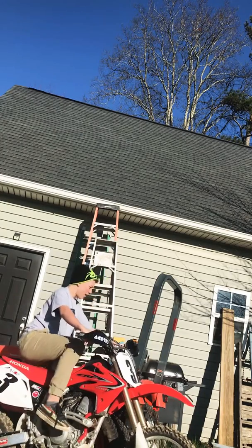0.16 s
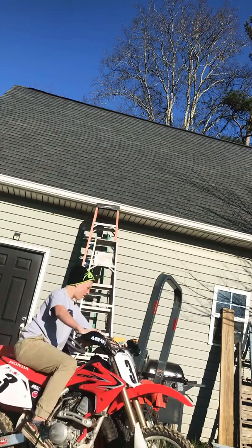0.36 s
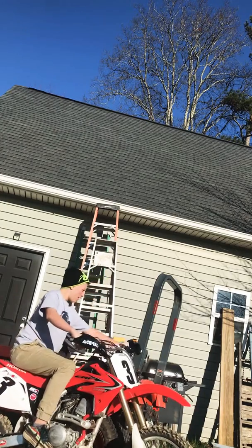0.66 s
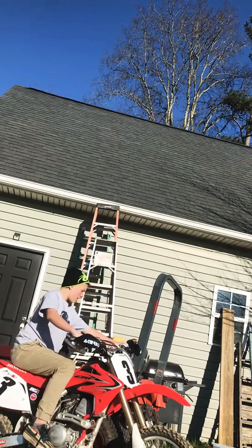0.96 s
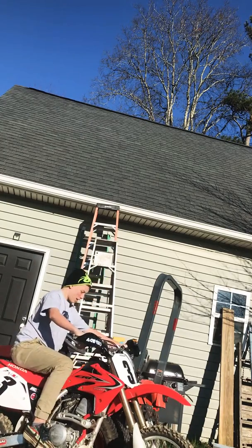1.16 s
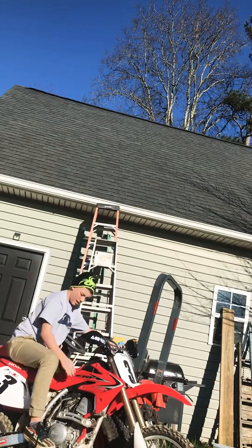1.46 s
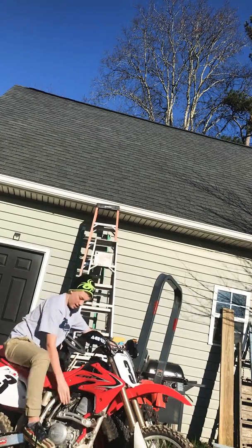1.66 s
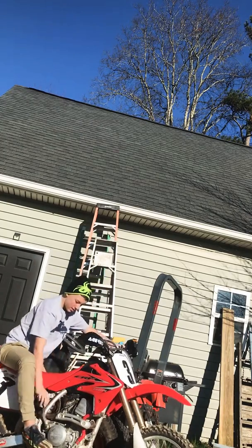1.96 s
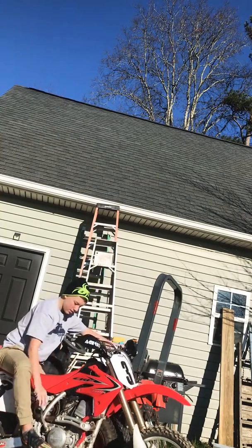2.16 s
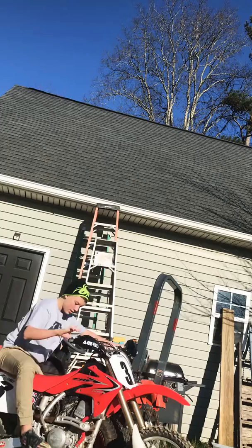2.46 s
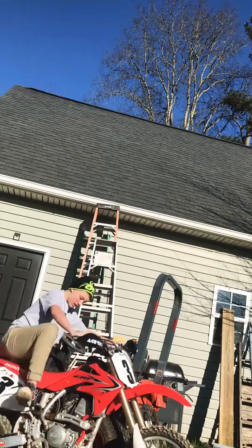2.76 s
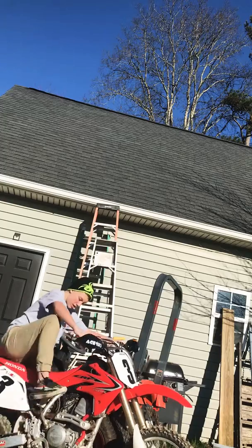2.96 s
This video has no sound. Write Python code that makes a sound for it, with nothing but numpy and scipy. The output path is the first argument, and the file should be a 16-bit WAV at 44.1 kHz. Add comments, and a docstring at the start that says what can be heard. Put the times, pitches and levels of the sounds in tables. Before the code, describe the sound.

A dirt bike engine fires close by, with quick exhaust thumps, clacks and a gritty whirr, then stalls with a ringing clank at about 0.6 seconds. Clothes rustle softly from around 1.2 seconds, and the bike creaks briefly near 1.7. Light metal knocks come near 1.2, between 2 and 2.5, and around 3 seconds. A low outdoor rumble and very faint electrical whine lie behind.

```python
"""Exhaust thumps, each led by a mechanical clack: a cold single-cylinder dirt bike fires a few times.
It stands near the microphone, in a yard beside a house wall that throws each thump back.
It stalls with a ringing clank; the rider shifts about, with rustling clothes, a short stick-slip
creak and light knocks on the bike. Behind it lie a low outdoor rumble and a faint electrical whine."""
import sys
import numpy as np
from scipy import signal
from scipy.fft import rfft, irfft, next_fast_len
from scipy.io import wavfile
from scipy.ndimage import uniform_filter1d

SR = 44100
rng = np.random.default_rng(int(sys.argv[2]) if len(sys.argv) > 2 else 0)


def materialize(psi):
    """Save the field psi as 16-bit PCM at rate SR to the path in sys.argv[1].

    A 1-D psi becomes a single channel; in a 2-D psi each row is a channel.
    """
    bounded = np.clip(np.atleast_2d(psi).T, -1, 1)
    quanta = np.round(bounded * 32767).astype(np.int16)
    wavfile.write(sys.argv[1], SR, quanta)


N = 136710
LEAD = SR // 10  # samples of run-up before time zero
TIME = np.arange(-LEAD, N) / SR


def amp(db):
    """Decibels to gain."""
    return 10 ** (np.asarray(db) / 20)


def unit(x):
    """Scale to rms 1."""
    return x / np.sqrt(np.mean(x ** 2) + 1e-20)


def colour(points, hz):
    """Gain of (freq_hz, level_db) points on a log axis, falling away past the ends."""
    f, db = np.transpose(points)
    inside = amp(np.interp(np.log(hz + 1), np.log(f + 1), db))
    return inside * np.minimum(1, hz / f[0]) ** 2 * np.minimum(1, f[-1] / (hz + 1)) ** 4


def filtered(x, response):
    """Pass x through a complex frequency response."""
    m = next_fast_len(len(x) + SR // 4)
    return irfft(rfft(x, m) * response(np.fft.rfftfreq(m, 1 / SR)), m)[:len(x)]


def resonances(modes, f):
    """Causal response of (pitch_hz, width_hz, level_db) modes, alternating in sign."""
    return sum((-1) ** k * amp(db) * 1j * f * width / (hz * hz - f * f + 1j * f * width)
               for k, (hz, width, db) in enumerate(modes))


def hump(f, centre_hz, octaves):
    """A bell on log frequency."""
    return np.exp(-.5 * (np.log2((f + 1) / centre_hz) / octaves) ** 2)


def noise(response):
    """Filtered noise of rms 1."""
    return unit(filtered(rng.standard_normal(len(TIME)), response))


def coloured_noise(points):
    """Noise of rms 1 with a tabled spectrum."""
    return noise(lambda f: colour(points, f))


def steadied(x, size):
    """Even out the loudness over size samples."""
    return x / np.sqrt(np.abs(uniform_filter1d(x * x, size)) + 1e-9)


def burst(start_s, rise_s, t60_s):
    """Envelope of a blow."""
    t = np.maximum(TIME - start_s, 0)
    return (1 - np.exp(-t / rise_s)) * amp(-60 * t / t60_s)


def tone(start_s, hz, rise_s, t60_s):
    """One struck mode."""
    return burst(start_s, rise_s, t60_s) * np.sin(2 * np.pi * hz * (TIME - start_s))


def yard(x, t60_s):
    """The diffuse tail that reaches the microphone from around the yard."""
    t = np.arange(SR) / SR
    tail = rng.standard_normal(SR) * amp(-60 * t / t60_s) * (1 - np.exp(-t / .0092))
    return signal.fftconvolve(x, tail / np.linalg.norm(tail))[:len(x)]


# Distant rumble and the hiss above it: freq_hz, level_db
RUMBLE = [(15, -28), (25, -10.5), (87, 1), (168, -14), (222, -16), (345, -25), (629, -30.5), (816, -28),
          (884, -28.5), (1290, -26), (1550, -26.5), (1820, -34), (2180, -39.5), (3000, -38), (3900, -49.5),
          (6600, -120)]
HISS = [(2200, -10.5), (4200, 5.5), (5200, 3.5), (8000, 0), (11500, 0), (13300, -0.5), (14050, 6),
        (14700, 0), (15800, -3)]
def outdoor_air():
    """The bed of the place: steady low rumble under a faint hiss."""
    return amp(-53) * steadied(coloured_noise(RUMBLE), size=8000) + amp(-75) * coloured_noise(HISS)


# Gaps in the whine: start_s, stop_s
WHINE_PAUSES = [(1.19, 1.25), (1.85, 1.94), (2.47, 2.53)]
# Spectrum of a tick: freq_hz, level_db
TICK = [(1500, -17), (2800, -1.5), (3500, -5.5), (4300, -3.5), (5500, -11.5), (7500, -7.5), (9000, -18),
        (15000, -15)]
def electrics(whine_hz=7020, width_hz=70, tick_period_s=.1024, tick_t60_s=.015):
    """Far in the background, a thin electrical whine and regular ticks."""
    paused = sum((TIME > start) & (TIME < stop) for start, stop in WHINE_PAUSES)
    running = uniform_filter1d(1. - paused, size=1800)
    whine = steadied(noise(lambda f: np.exp(-.5 * ((f - whine_hz) / width_hz) ** 2)), size=400)
    since_tick = (TIME - .7165) % tick_period_s
    ticks = amp(-58.5 - 60 * since_tick / tick_t60_s) * coloured_noise(TICK)
    return amp(-76) * running * whine + ticks


def pips(pitch_hz=10300, spread_hz=150, gap_s=.07, half_s=.006):
    """Tiny high pips at uneven gaps."""
    times = np.cumsum(gap_s * (.5 + rng.random(size=50)))
    pitches = rng.normal(pitch_hz, spread_hz, len(times))
    nearest = np.searchsorted((times[1:] + times[:-1]) / 2, TIME)
    t = TIME - times[nearest]
    return amp(-77.5) * np.exp(-(t / half_s) ** 2) * np.sin(2 * np.pi * pitches[nearest] * t)


# The rider's clothes, heard dry: peak_s, half_length_s, level_db, centre_hz
RUSTLES = [(1.394, 0.045, -59.5, 1070), (1.22, 0.17, -66.5, 1240), (2.156, 0.27, -65, 950),
           (2.36, .06, -70, 4900), (2.1, .04, -63.5, 2520), (2.35, 0.075, -62, 1380),
           (2.82, 0.034, -62, 1330), (2.93, 0.26, -65.5, 740)]
def rustles():
    """Soft, grainy swells of cloth as the rider moves."""
    grain = unit(amp(4 * noise(lambda f: f < 300)))
    return grain * sum(amp(db) * np.exp(-((TIME - s) / half) ** 2) * noise(lambda f: hump(f, hz, .39))
                       for s, half, db, hz in RUSTLES)


# Course of the creak: time_s, level_db, slip_rate_hz
CREAK = [(1.565, -45.5, 27.9), (1.594, -46, 28), (1.599, -43, 70), (1.626, -43, 120), (1.657, -39.5, 105),
         (1.681, -39, 85), (1.696, -48, 110), (1.703, -36.5, 120), (1.736, -36.5, 122), (1.747, -50, 115),
         (1.81, -49.5, 70), (1.84, -68, 50)]
# Modes of the rubbed part: pitch_hz, width_hz, level_db
CREAK_MODES = [(360, 28, -14.5), (488, 25, -11), (600, 30, -11), (842, 65, -3.5), (946.5, 37, 3.5),
               (1102, 67, -1), (1192, 93, -7), (1427, 35, -1), (2146, 93, -19), (2180, 53, -30),
               (2830, 250, -24)]
def creak(spread_db=1.5, scatter_s=.0004, snap_db=-12.5, echo_db=-7.5):
    """A rubbed part of the bike sticks and slips, each slip a dry snap and a ring; the yard answers."""
    s, db, rate = np.transpose(CREAK)
    slip_count = np.cumsum(np.interp(TIME, s, rate, left=0, right=0)) / SR
    times = TIME[1:][np.diff(np.ceil(slip_count)) > 0]
    size_jitter, time_jitter = rng.standard_normal((len(times), 2)).T
    sizes = amp(np.interp(times, s, db) + spread_db * size_jitter)
    slips = np.bincount(np.searchsorted(TIME, times + scatter_s * time_jitter), sizes, len(TIME))
    ring = lambda f: resonances(CREAK_MODES, f) / (1 + (f / 2400) ** 8)
    rub = amp(41) * filtered(slips, lambda f: ring(f) + amp(snap_db) * hump(f, 1040, octaves=.43))
    return rub + amp(echo_db) * yard(rub, t60_s=.25)


# Treble of struck metal: freq_hz, level_db
METAL_TREBLE = [(3000, -30), (3700, -11), (4300, 6.5), (5000, -6.5), (6100, -0.5), (7000, -10.5),
                (7700, -16.5), (8700, -12.5), (10500, -26.5), (15500, -38)]
def metal_treble():
    """Bright noise for the click of each knock and clack."""
    return coloured_noise(METAL_TREBLE)


# The rider's knocks: start_s, level_db, pitch_hz, second_pitch_hz, treble_db
KNOCKS = [(.823, -50, 775, 620, -22), (1.172, -41, 1240, 1950, -19.5), (1.254, -46, 1530, 1250, -14),
          (2.029, -33.5, 1466, 1263, -22.5), (2.1688, -30, 1383, 1827, -13),
          (2.211, -39.5, 1260, 1920, -12), (2.226, -34.5, 1240, 1475, -20.5),
          (2.499, -33.5, 1976, 1665, -25), (2.546, -36.5, 1197, 2075, -17), (2.995, -34, 1282, 1510, -17),
          (3.036, -34, 1900, 1540, 1.5), (3.082, -28.5, 1530, 1280, -27), (3.088, -29, 1140, 1850, -18)]
# Ring of the knocked frame: freq_hz, level_db
FRAME = [(380, -4.5), (520, -10), (700, -12.5), (950, -3.5), (1230, 2.5), (1400, -1), (1550, -4),
         (1750, -9.5), (2000, -5.5), (2400, -17), (2900, -10.5), (3600, -28.5), (5000, -57)]
def knocks():
    """Light blows on the bike: two short metal tones, a clonk of the frame and a bright click."""
    out, click = np.zeros(len(TIME)), metal_treble()
    for s, db, hz, second_hz, treble_db in KNOCKS:
        clonk = steadied(coloured_noise(FRAME), size=220)
        out += amp(db - 3) * tone(s, hz, rise_s=.001, t60_s=.042)
        out += amp(db - 8.5) * tone(s, second_hz, rise_s=.00084, t60_s=.042)
        out += amp(db - 10.5) * burst(s, rise_s=.00028, t60_s=.11) * clonk
        out += amp(db + treble_db - 6) * burst(s, rise_s=.000094, t60_s=.034) * click
    return out


# Modes of a steel part: pitch_hz, level_db, t60_s
STEEL = [(4538, -4, .62), (4790, 0, .37), (6142, -7, .3), (6788, -11, .4)]
# Low modes of the shaken frame: pitch_hz, width_hz, level_db
JOLT = [(84, 23, -6), (150, 39, -5), (274, 35, -10), (430, 85, -35)]
def stall(start_s=.575):
    """The crank stops dead: the frame jolts and a steel part rings on."""
    blow = np.bincount([np.searchsorted(TIME, start_s)], [amp(30.5)], len(TIME))
    ring = sum(amp(db - 52.5) * burst(start_s, .00096, t60_s) * np.sin(2 * np.pi * hz * TIME)
               for hz, db, t60_s in STEEL)
    return ring + filtered(blow, lambda f: resonances(JOLT, f) / (1 + (f / 900) ** 2))


# Gears and chain running down: time_s, level_db
WHIRR_LEVEL = [(0, -32.5), (.3, -34.5), (.5, -37), (.56, -39.5), (.6, -45.5), (.635, -45), (.69, -68),
               (.73, -60.5), (.85, -88)]
# Their spectrum: freq_hz, level_db
WHIRR_COLOUR = [(300, 8.5), (450, -8.5), (620, -11), (840, -0.5), (1050, -9), (1360, 1), (1850, -5),
                (2100, -3), (2450, -12.5), (2750, -9.5), (3600, -24.5), (4400, -18), (6100, -24),
                (7700, -33.5), (8700, -35.5), (11000, -42.5), (15500, -67)]
def gears():
    """A gritty whirr of gears and chain that dies with the engine."""
    level = amp(np.interp(TIME, *np.transpose(WHIRR_LEVEL), left=-120, right=-120))
    grit = unit(amp(2.26 * noise(lambda f: f < 250)))
    return level * grit * coloured_noise(WHIRR_COLOUR)


# Blows inside the engine: start_s, level_db, treble_db, pitch_hz
CLACKS = [(.0208, -21.5, -16, 1524), (.0753, -15, -16.5, 1968), (0.1236, -17.5, -17, 1575),
          (.18, -14.5, -17, 1974), (0.228, -18, -19, 1637), (0.2849, -15, -19.5, 1983),
          (0.3401, -19, -15.5, 1920), (0.407, -18.5, -20, 1720), (0.4669, -16, -19, 1700),
          (.546, -19.5, -20.5, 2114), (0.5681, -21, -26, 1840), (0.5742, -17, -7, 1975),
          (0.5818, -20, -18, 1385), (0.6003, -22.5, -19, 1380), (0.6456, -29.5, -14.5, 1230),
          (0.6683, -33.5, -17, 1444), (0.681, -41, -24, 1380)]
# Ring of the crankcase: freq_hz, level_db
CRANKCASE = [(400, -20.5), (700, -18), (900, -7.5), (1050, -17), (1215, 4.5), (1300, -4.5), (1390, 0.5),
             (1480, -3.5), (1570, -2), (1700, -10.5), (1980, -9.5), (2400, -19), (2750, -15.5),
             (3150, -17.5), (3600, -29.5)]
def clacks(case_hz=1213.5):
    """Valve gear and crank strike: each hard ping and click blooms in the crankcase."""
    case = steadied(coloured_noise(CRANKCASE), size=220)
    out, click = np.zeros(len(TIME)), metal_treble()
    for s, db, treble_db, ping_hz in CLACKS:
        out += amp(db - 1.5) * tone(s, ping_hz, rise_s=.00066, t60_s=.036)
        out += amp(db - 9.5) * tone(s, case_hz, rise_s=.0088, t60_s=.1)
        out += amp(db - 4.5) * burst(s, rise_s=.0024, t60_s=.058) * case
        out += amp(db + treble_db - 4.5) * burst(s, rise_s=.00041, t60_s=.047) * click
    return out


# Exhaust strokes: start_s, level_db
STROKES = [(-.0158, 4), (0.0876, 2.5), (0.1922, 2.5), (0.2418, -3.5), (0.2985, 2), (0.3535, -4.5),
           (0.419, -0.94), (0.483, -5.5)]
# Silencer modes: pitch_hz, width_hz, level_db
SILENCER = [(67.2, 6.2, 3.5), (111, 18.2, 6), (162, 5.4, -19), (212.4, 25.6, -10), (237.2, 12.3, -9.5),
            (261.6, 15, -2.5), (300, 54, -12.5), (318.5, 24, -14), (365.3, 16, -10.5), (407, 44, -19),
            (500, 140, -27.5)]
# Wall echoes, travelling about 4 and 8 m further to the microphone: delay_s, gain
WALLS = [(0.0119, 0.3), (0.0245, 0.35)]
# Gas rushing from the pipe, and the low echo of the yard: freq_hz, level_db
GAS = [(150, 1), (330, 16), (450, 1.5), (620, -3), (850, 6.5), (1300, 5), (2000, 0), (2800, -10),
       (3600, -20.5), (4400, -11), (6300, -19.5), (8000, -31), (11000, -35.5), (15500, -39)]
BOOM = [(45, -15.5), (62, 6.5), (80, -5), (130, 1.5), (170, -10), (260, -29.5), (400, -40)]
def exhaust(pipe_top_hz=830, bark_hz=333.2, bark_delay_s=.0309, bark_half_s=.0065):
    """Each stroke thumps the silencer, comes back off the walls and trails gas and a low echo."""
    puffs, bark, gas, boom = np.zeros((4, len(TIME)))
    for s, db in STROKES:
        t = TIME - s
        edge_hz = 1330 * 2 ** (-.42 * db)  # stronger strokes push for longer
        push = (t >= 0) * np.exp(-2 * np.pi * edge_hz * np.maximum(t, 0))
        puffs += amp(db + 41.5) * push / push.sum()
        late_swell = np.exp(-((t - bark_delay_s) / bark_half_s) ** 2)  # the pipe's bark comes back late
        bark += amp(db - 20) * late_swell * np.sin(2 * np.pi * bark_hz * t)
        gas += amp(db - 23.5) * burst(s, rise_s=.0006, t60_s=.14)
        boom += amp(db - 33) * burst(s, rise_s=.05, t60_s=.9)
    walls = lambda f: 1 + sum(gain * np.exp(-2j * np.pi * f * delay) for delay, gain in WALLS)
    low_cut = signal.butter(2, 1, 'high', analog=True)
    tailpipe = lambda f: signal.freqs(*low_cut, f / 60)[1] / (1 + (f / pipe_top_hz) ** 2)
    thump = filtered(puffs, lambda f: resonances(SILENCER, f) * walls(f) * tailpipe(f))
    gas *= coloured_noise(GAS)
    boom *= steadied(coloured_noise(BOOM), size=2000)
    return thump + bark + gas + boom


def scene():
    """The bike and its rider in the yard, from one fixed microphone."""
    metal = clacks() + gears() + stall() + knocks() + creak()
    foreground = exhaust() + metal + amp(-13) * yard(metal, t60_s=.15) + rustles()
    background = outdoor_air() + electrics() + pips()
    return (foreground + background)[None, LEAD:]


def record(dry):
    """The microphone channel keeps nothing above 15.8 kHz."""
    return np.array([filtered(channel, lambda f: f < 15800) for channel in dry])


dry = scene()
out = record(dry)
materialize(out)
```